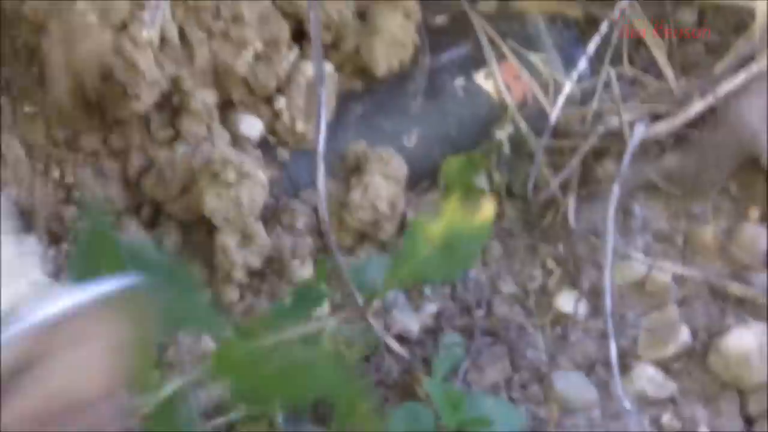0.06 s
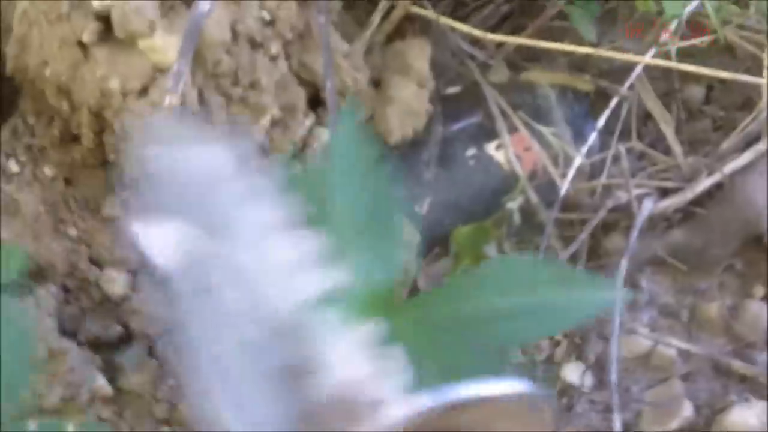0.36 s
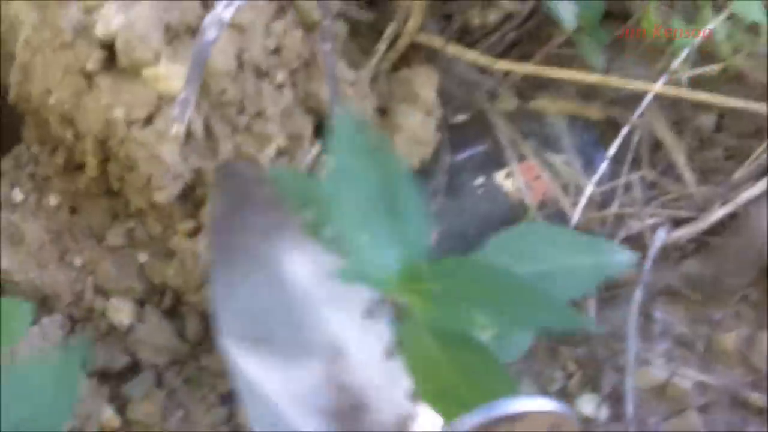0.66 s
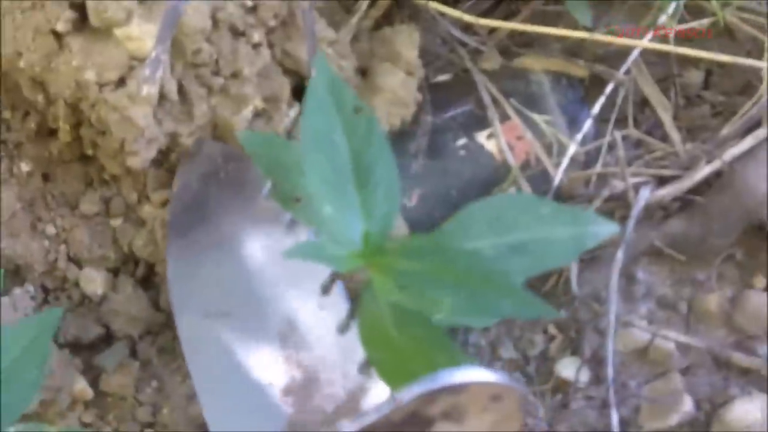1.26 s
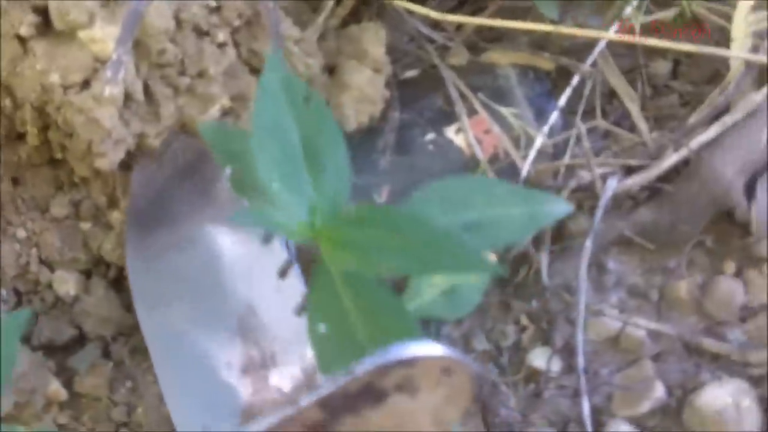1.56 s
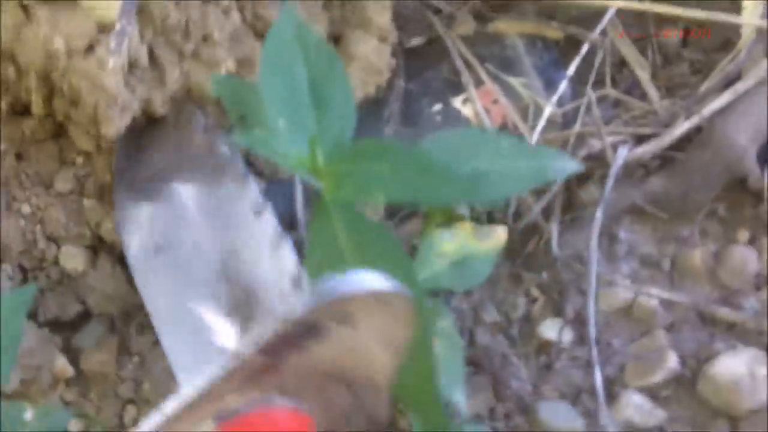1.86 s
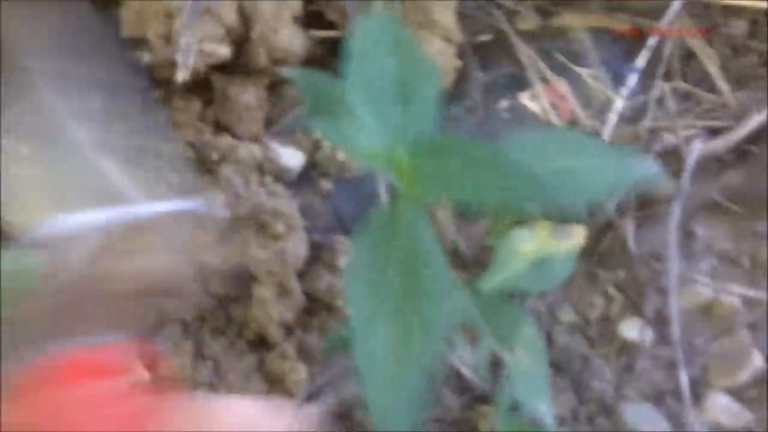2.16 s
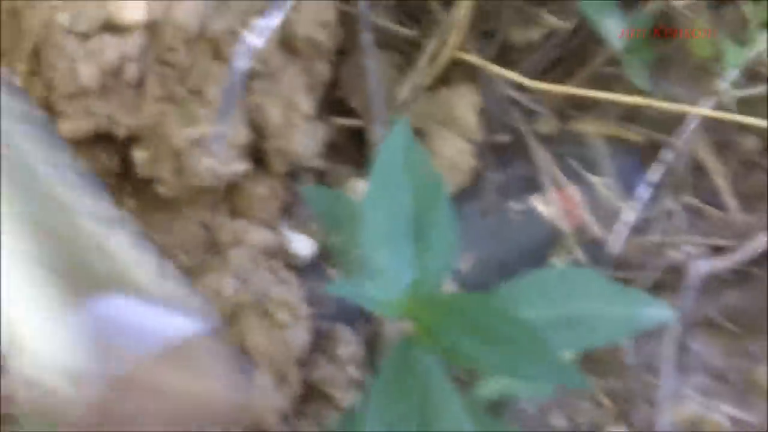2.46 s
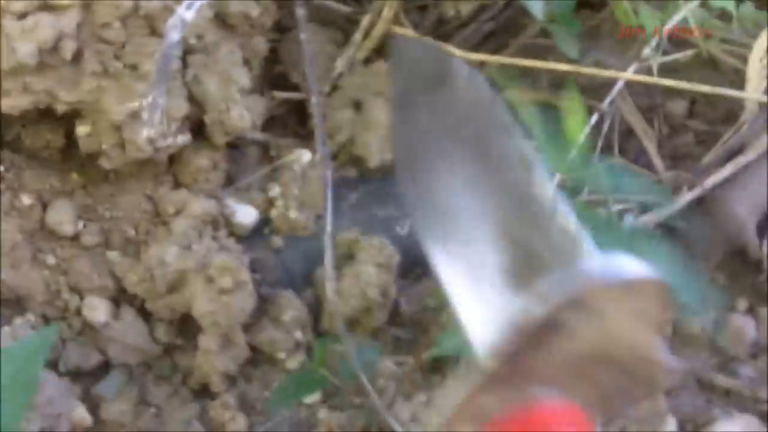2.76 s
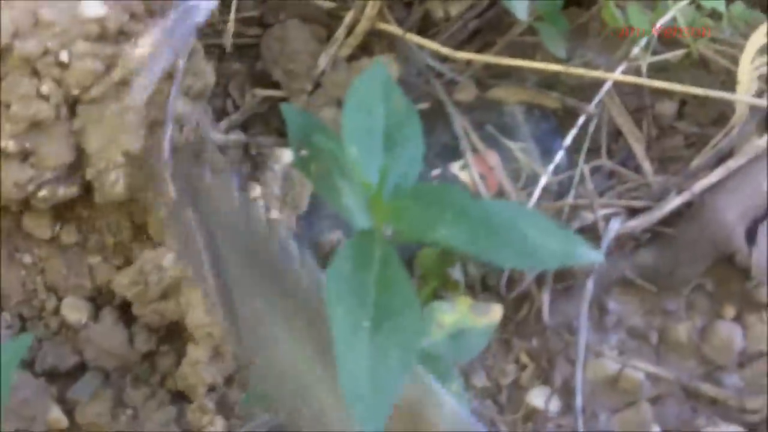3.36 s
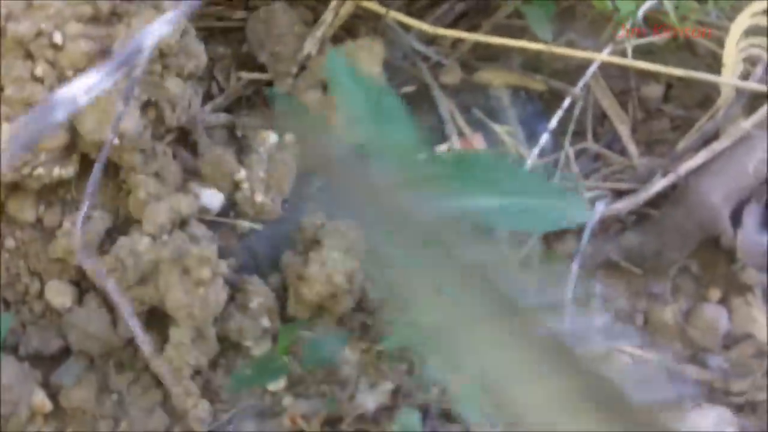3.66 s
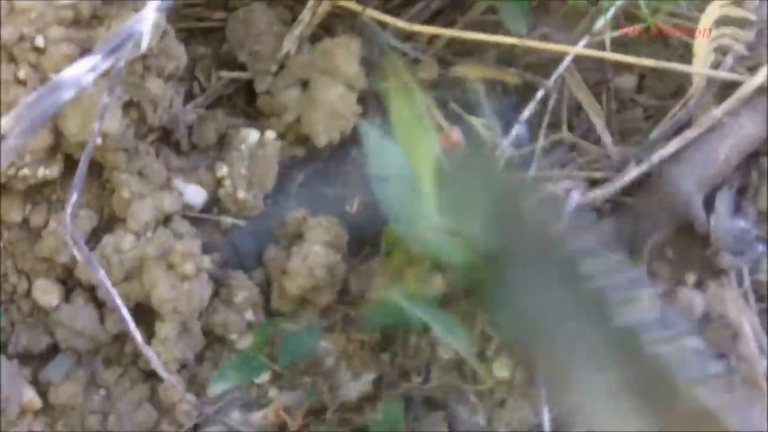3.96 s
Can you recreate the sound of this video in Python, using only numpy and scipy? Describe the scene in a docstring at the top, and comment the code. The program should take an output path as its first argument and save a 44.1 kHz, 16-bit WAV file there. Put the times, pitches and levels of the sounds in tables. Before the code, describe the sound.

Close, irregular scrapes and clinks come from a metal trowel digging stony earth outdoors. A bird sings a short phrase, the blade hits a stone hard, and digging resumes, over soft wind on the microphone and a faint, distant engine.

```python
"""Light air stirs at the microphone and a far engine hums throughout. From the start a close steel trowel
scrapes through dry, gritty soil: grit ticks, stones knock and briefly ring the blade, earth thuds, small
clods tap. From 0.8 s a bird whistles liquid notes, while the buried blade rasps and grit slips on it;
a thin buzz ends the phrase at 2 s. The hardest knock lands at 2.3 s. More digging and two faint
whistles follow from 3 s."""
import sys
import numpy as np
from scipy import signal
from scipy.fft import rfft, irfft, next_fast_len
from scipy.io import wavfile
from scipy.ndimage import map_coordinates

SR = 44100
rng = np.random.default_rng(int(sys.argv[2]) if len(sys.argv) > 2 else 0)


def dump_mix(stems):
    """Bounce the given channels to the path in sys.argv[1] as a 16-bit WAV at rate SR."""
    frames = np.atleast_2d(stems).T  # one column per channel
    limited = np.clip(frames, -1, 1)  # hard clip at full scale
    pcm = np.round(limited * 32767).astype(np.int16)
    wavfile.write(sys.argv[1], SR, pcm)


N = 176400

# Spectra of air (centre, left-right difference) and buffets. Each row: frequency in Hz, gain in dB.
AIR_MID_SPECTRUM = [(20, 2.5), (45, -4), (90, -7.5), (140, -16.5), (250, -20.5), (500, -28.5), (1000, -30),
                    (2000, -35.5), (3200, -36), (4500, -42.5), (6000, -31), (8000, -36), (11000, -46),
                    (15000, -50)]
AIR_SIDE_SPECTRUM = [(20, 14.5), (90, -4), (250, -19.5), (500, -21.5), (1200, -31.5), (4000, -49),
                     (9000, -37), (15000, -29.5)]
BUFFET_SPECTRUM = [(12, 29), (28, -5), (50, -18), (90, -23), (150, -41), (500, -70)]
# Buffets on the microphone. Each row: peak time in seconds, width in seconds, level in dB.
BUFFETS = [(0.348, 0.014, -33), (3.07, 0.024, -29.5), (3.33, 0.068, -36), (3.71, 0.063, -46.5)]
# Strongest engine order. Each row: time in seconds, level in dB.
FIRING_LEVELS = [(0, -59.5), (.7, -52), (1.1, -58.5), (1.5, -50.5), (1.75, -61.5), (2.1, -50.5), (2.5, -60),
                 (4, -57.5)]
# Weaker engine orders. Each row: frequency in Hz, level in dB.
ENGINE_ORDERS = [(115.8, -65), (154.4, -65.5), (173.6, -70), (231.5, -73.5)]
# Strokes through soil. Each row: peak time, rise and fall in seconds; hiss, crunch and ring in dB.
STROKES = [(.095, 0.12, 0.1, -45.5, -52.5, -42), (0.271, 0.073, 0.087, -50.5, -56.5, -77),
           (0.336, 0.017, 0.027, -38.5, -42.5, -80), (.42, 0.13, 0.12, -46, -53, -73),
           (.55, 0.53, 0.26, -58.5, -57.5, -80), (.845, 0.015, 0.049, -56, -57.5, -53),
           (1.016, 0.056, 0.037, -69, -65, -49.5), (1.803, 0.089, 0.047, -37.5, -52, -70),
           (1.825, 0.093, 0.038, -56, -48, -72), (2.045, 0.12, 0.29, -45, -50.5, -50.5),
           (2.21, 0.046, 0.055, -48.5, -55, -47), (2.266, 0.014, 0.023, -45, -42.5, -31.5),
           (2.44, 0.45, 0.081, -57, -67.5, -77), (2.62, 0.38, 0.22, -61.5, -72, -104),
           (3.033, 0.0033, 0.023, -42, -44, -31), (3.18, 0.18, 0.13, -55.5, -60, -57),
           (3.35, 0.28, 0.38, -54, -60, -79), (3.489, 0.027, 0.063, -34.5, -46.5, -32),
           (3.58, 0.14, 0.08, -41, -51, -57), (3.70, 0.078, 0.1, -48.5, -61.5, -84)]
# Blade modes: bending and twisting, edge, soil-damped. Each row: frequency in Hz, gain in dB,
# T60 in seconds.
BODY_MODES = [(589, -10.5, 0.024), (763, -9.5, 0.1), (920, -13, 0.22), (1427, 7.5, 0.041), (1795, 4, 0.032),
              (1972, 2.5, 0.088), (2482, -4.5, 0.096), (3704, -0.5, 0.019)]
EDGE_MODES = [(5310, 0.5, 0.028), (5950, -0.5, 0.014), (7170, -0.5, 0.025), (7484, 4, 0.023),
              (8860, -7, 0.027), (9150, -12.5, 0.03), (9680, -1.5, 0.025), (11460, -9.5, 0.021)]
BURIED_MODES = [(1707, -15.5, 0.017), (6000, -1.5, 0.0097), (6250, -12, 0.016), (7660, 2.5, 0.0044),
                (8550, -5, 0.0063), (10020, -11, 0.0084)]
# Off-centre contact. Each entry: one body mode, favoured (1), unchanged (0) or weakened (-1).
TWIST_SIGNS = [0, -1, 1, 0, -1, 1, -1, 0]
# Spectra of soil and stone contacts. Each row: frequency in Hz, gain in dB.
HISS_SPECTRUM = [(300, -34), (2000, -25), (3800, -12), (4700, -11.5), (5700, 4), (7500, 2.5), (9500, -3.5),
                 (12000, -15), (15000, -21)]
CRUNCH_SPECTRUM = [(120, -10), (300, -14), (700, -3), (1100, -6), (1700, -2.5), (2050, -3), (2400, -6),
                   (3800, -11), (6000, -28.5)]
TICK_SPECTRUM = [(300, -27), (1700, -15), (3000, -24), (4600, -18), (6000, 0), (7800, -3.5), (10000, -13.5),
                 (12000, -20.5), (15000, -31)]
CRACK_SPECTRUM = [(150, -27), (600, -34), (1050, -7.5), (1400, -1.5), (2300, -16), (3000, -17), (3900, -5),
                  (4700, -24), (5600, 5.5), (6500, -5), (7700, 1), (10000, -11), (12000, -16.5),
                  (15000, -26)]
TAP_SPECTRUM = [(100, 7), (350, -2.5), (750, -14.5), (1200, 4), (1700, 3.5), (2400, 3.5), (3600, -20),
                (6000, -27)]
THUD_SPECTRUM = [(60, -12), (220, 9.5), (500, 0.5), (800, -5), (2000, -30)]
# Grit snapping. Each row: start in seconds, level in dB.
TICKS = [(.0255, -40.5), (0.035, -44), (0.055, -33.5), (0.2398, -43.5), (.3295, -38.5), (0.3468, -33.5),
         (.401, -44.5), (0.422, -50), (0.4634, -38), (.584, -50.5), (1.79, -37.5), (1.808, -32),
         (2.212, -26.5), (2.4931, -47), (2.5, -49), (3.2926, -50), (3.322, -48), (3.3461, -40),
         (3.3708, -36.5), (3.449, -44), (3.596, -42), (3.7026, -38.5)]
# Blade on stones. Each row: start in seconds; crack, body ring and edge ring in dB; body tilt in dB
# per octave; off-centre bias in dB; crush before contact in seconds.
KNOCKS = [(0.0685, -41, -38.5, -45, 0, -7, .002), (.118, -38, -40, -42, -5, -2, 0.0025),
          (.1355, -52, -44.5, -30, 18, -3, .001), (0.1573, -41.5, -34.5, -48, -16.5, 0.5, 0.00081),
          (0.2159, -49, -58, -49.5, 8, 4, .001), (0.2743, -67, -53, -45.5, 6, 11, .002),
          (.831, -56, -50.5, -55, -14, -8, .001), (1.2015, -46, -56.5, -53, 19, -3, 0.003),
          (2.2531, -38, -33.5, -46, -1, 0, .001), (2.2647, -50, -36.5, -45, -5, -4.5, .004),
          (2.291, -55, -53.5, -39, 5, 3, 0.0043), (2.3167, -14, -23, -25, -4, 3.5, 0.00078),
          (2.3338, -41, -39.5, -32, 21, 5, .001), (3.0314, -48, -43.5, -35.5, -3.5, 3, .001),
          (3.0338, -45, -37.5, -40, -9.5, -8, .002), (3.0477, -51, -42, -41, -5, -1.5, .001),
          (3.0549, -39, -59, -29.5, 20, -14, .001), (3.0788, -40, -72, -44, 12, 0, .001),
          (3.4919, -23, -32.5, -30, 3, -6.5, 0.0098), (3.4952, -38, -36.5, -30, 9, -14, .002),
          (3.508, -25.5, -37.5, -30, 5, 3.5, 0.0025), (3.5258, -26.5, -27, -34, 2.5, -6, 0.00044)]
# Earth giving way. Each row: start in seconds, level in dB.
THUDS = [(0.156, -49), (0.349, -47), (2.317, -50.5)]
# Clods and pebbles landing. Each row: start in seconds, level in dB, pitch shift in octaves.
TAPS = [(.247, -42.5, -0.074), (.258, -47, -0.21), (0.346, -44, 0.25), (0.361, -46.5, 0.034),
        (.397, -50, -0.064), (0.421, -43, -1.1), (0.4624, -50, 0.52), (0.744, -47, -0.91),
        (.772, -48.5, 0.16), (.832, -45, -1.14), (0.88, -54, -0.11), (1.065, -46.5, -0.087),
        (1.83, -49, -0.33), (1.929, -47, 0.25), (2.2102, -36.5, -0.018), (3.465, -41.5, -0.21)]
# Bird notes. Each row: start and length in seconds, start and target pitch in Hz, glide time
# constant in seconds, level in dB.
WHISTLES = [(0.768, 0.06, 3000, 3180, 0.017, -64), (0.861, 0.11, 2870, 3080, 0.0365, -66),
            (1.121, 0.045, 3200, 3230, 0.016, -57), (1.164, 0.086, 3090, 3125, 0.004, -45.5),
            (1.214, 0.19, 1905, 2373, 0.047, -49), (1.351, 0.14, 3380, 3425, .04, -53.5),
            (1.435, 0.097, 3106, 2870, 0.0141, -46), (1.629, 0.019, 2897, 2900, .02, -48),
            (3.072, 0.042, 3350, 3280, 0.026, -60.5), (3.876, 0.036, 3740, 2540, 0.0125, -62)]
# Buzz voices. Each row: start and length in seconds; start pitch, end pitch and flutter in Hz;
# level in dB.
BUZZ_VOICES = [(1.621, .37, 6900, 6650, 188, -49), (1.609, 0.38, 5200, 5420, 83, -58)]
# Buried pushes. Each row: peak time, rise and fall in seconds; edge rasp and body rasp in dB.
PUSHES = [(1.01, 0.12, 0.15, -78, -57.5), (1.46, 0.21, 0.25, -53, -57), (1.62, 0.11, 0.096, -49, -54.5),
          (1.816, 0.05, 0.037, -60, -43), (2.04, 0.1, 0.14, -40.5, -48)]
# Grit slipping on the buried blade. Each row: start in seconds, level in dB.
SLIPS = [(1.339, -49.5), (1.403, -35), (1.497, -39.5), (1.51, -48), (1.604, -32.5), (1.6225, -37),
         (1.663, -37), (1.679, -44), (2.065, -47), (2.099, -40)]
# Constant offset, left then right. Each row: offset as a fraction of full scale.
DC_OFFSET = [
    [-.0092],
    [-.0168],
]

SOIL_DETUNE_RATIO = 0.0037  # soil pressure shifts the modes
TICK_T60_S, GRIT_CRUSH_S, GRIT_CRUSH_DB = 0.0036, 0.0088, -3


def amp(db):
    """Decibels to gain."""
    return 10 ** (np.asarray(db) / 20)


def unit(x):
    """Scale to rms 1."""
    return x / np.sqrt(np.mean(x ** 2) + 1e-20)


def unit_attack(x):
    """Scale to rms 1 over the first 4 ms."""
    return x / np.sqrt(np.mean(x[:SR // 250] ** 2))


def clock(length_s):
    """Sample times in seconds."""
    return np.arange(int(length_s * SR)) / SR


def add(track, start_s, x):
    """Mix x into the track."""
    i = max(0, round(start_s * SR))
    track[i:i + len(x)] += x[:max(0, N - i)]


def wobble(knots_per_s):
    """Smooth random curve, N samples."""
    return map_coordinates(rng.standard_normal(4096), [np.arange(N) * knots_per_s / SR], mode="wrap")


def colour(x, spectrum):
    """Minimum-phase filter through (Hz, dB) points."""
    n = x.shape[-1]
    size = 2 * next_fast_len(n // 2 + 2048)
    hz, db = np.transpose(spectrum)
    gain_db = np.interp(np.log(np.fft.rfftfreq(size, 1 / SR) + 1), np.log(hz), db)
    cepstrum = irfft(np.log(amp(gain_db)))
    cepstrum[1:size // 2] *= 2
    cepstrum[size // 2 + 1:] = 0
    return irfft(rfft(x, size) * np.exp(rfft(cepstrum)), size)[..., :n]


def air(level_db=-50.5, side_db=-14, swell_db=1):
    """Quiet outdoor air, nearly mono, softly buffets the microphone."""
    t = np.arange(N) / SR
    noise = lambda spectrum: unit(colour(rng.standard_normal(N), spectrum))
    mid = noise(AIR_MID_SPECTRUM) * amp(level_db + swell_db * wobble(1.43))
    side = noise(AIR_SIDE_SPECTRUM) * amp(level_db + side_db)
    puffs = sum(amp(db) * np.exp(-.5 * ((t - peak_s) / width_s) ** 2) for peak_s, width_s, db in BUFFETS)
    return mid + puffs * noise(BUFFET_SPECTRUM) + np.array([side, -side])


def tone(hz):
    """Sine following a pitch curve."""
    return np.sin(2 * np.pi * np.cumsum(hz) / SR)


def engine(firing_hz=77.4, waver_db=2, drift_hz=0.32):
    """A far engine hums in low, wavering orders."""
    order = lambda hz: unit(tone(hz + drift_hz * wobble(4.56))) * amp(waver_db * wobble(5.13))
    firing_db = np.interp(np.arange(N) / SR, *np.transpose(FIRING_LEVELS))
    return amp(firing_db) * order(firing_hz) + sum(amp(db) * order(hz) for hz, db in ENGINE_ORDERS)


def swells(rows, shape=0.91, judder_db=3, judder_per_s=83):
    """Juddering stroke gains, one curve per level column; rise and fall each span 20 dB."""
    t, power = np.arange(N) / SR, 0
    for peak_s, rise_s, fall_s, *levels_db in rows:
        distance = np.where(t < peak_s, (peak_s - t) / rise_s, (t - peak_s) / fall_s)
        envelope = amp(-20 * np.minimum(distance ** shape, 10))
        power = power + (amp(levels_db)[:, None] * envelope) ** 2
    return np.sqrt(power) * amp(judder_db * wobble(judder_per_s))


def grains(rate_per_s=7000, spread_db=6):
    """Dense tiny impacts of very unequal size."""
    impacts = (rng.random(N) < rate_per_s / SR) * rng.choice([-1, 1], N)
    return impacts * amp(spread_db * np.clip(rng.standard_normal(N), -3, 3))


def contact_db(tilt_db_per_oct, bias_db):
    """Body mode weights: hard contact tilts them up, off-centre contact twists the blade."""
    return tilt_db_per_oct * np.log2(np.transpose(BODY_MODES)[0]) + bias_db * np.array(TWIST_SIGNS)


def ring(modes, weights_db=0, detune_ratio=0, scatter_db=1.7, rise_s=0.00005):
    """Damped blade modes, weighted anew for each contact point."""
    t = clock(.3)
    hz, db, t60_s = np.transpose(modes)
    hz = hz * (1 + detune_ratio * rng.standard_normal(len(hz)))
    signs = rng.choice([-1, 1], len(hz))
    gains = signs * amp(db + weights_db + scatter_db * rng.standard_normal(len(hz)))
    partials = amp(-60 * t / t60_s[:, None]) * np.sin(2 * np.pi * hz[:, None] * t)
    onset = 1 - np.exp(-t / rise_s)
    return unit_attack(onset * (gains @ partials))


def rub(modes, weights_db=0, point_count=3, wander_per_s=25):
    """Grains drive the modes; the mix shifts as the rubbing point wanders."""
    points = [unit(signal.fftconvolve(grains(), ring(modes, weights_db, SOIL_DETUNE_RATIO))[:N])
              for _ in range(point_count)]
    shares = np.array([np.exp(wobble(wander_per_s)) for _ in points])
    return unit((shares * points).sum(0) / np.linalg.norm(shares, axis=0))


def scrapes(edge_db=3):
    """Dragged grains hiss, crunch and ring the free blade."""
    hiss_gain, crunch_gain, ring_gain = swells(STROKES)
    hiss = unit(colour(grains(), HISS_SPECTRUM))
    crunch = unit(colour(grains(), CRUNCH_SPECTRUM))
    body = rub(BODY_MODES, contact_db(tilt_db_per_oct=4, bias_db=2))
    edge = amp(edge_db) * rub(EDGE_MODES)
    return hiss_gain * hiss + crunch_gain * crunch + ring_gain * unit(body + edge)


def crush(length_s):
    """Grit gives way just before a contact."""
    rise = np.linspace(0, 1, int(length_s * SR) + 8) ** 2
    return colour(np.pad(rise * rng.standard_normal(len(rise)), (0, 512)), HISS_SPECTRUM)


def burst(spectrum, t60_s, rise_s=0.0005):
    """One contact: short, coloured, decaying noise."""
    t = np.arange(2048) / SR
    envelope = (1 - np.exp(-t / rise_s)) * amp(-60 * t / t60_s)
    return unit_attack(colour(rng.standard_normal(len(t)) * envelope, spectrum))


def grit_ticks():
    """Grit crushes, then snaps."""
    out = np.zeros(N)
    for start_s, db in TICKS:
        add(out, start_s - GRIT_CRUSH_S, amp(db + GRIT_CRUSH_DB) * crush(GRIT_CRUSH_S))
        add(out, start_s, amp(db) * burst(TICK_SPECTRUM, TICK_T60_S))
    return out


def stone_knocks():
    """The blade crushes grit, cracks against a stone and rings."""
    out = np.zeros(N)
    for start_s, crack_db, body_db, edge_db, tilt_db_per_oct, bias_db, crush_s in KNOCKS:
        add(out, start_s - crush_s, amp(edge_db) * crush(crush_s))
        add(out, start_s, amp(crack_db) * burst(CRACK_SPECTRUM, t60_s=0.0043))
        add(out, start_s, amp(body_db) * ring(BODY_MODES, contact_db(tilt_db_per_oct, bias_db)))
        add(out, start_s, amp(edge_db) * ring(EDGE_MODES, detune_ratio=SOIL_DETUNE_RATIO))
    return out


def earth_thuds():
    """Earth gives way under the blade with a low thud."""
    out = np.zeros(N)
    for start_s, db in THUDS:
        add(out, start_s, amp(db) * burst(THUD_SPECTRUM, t60_s=0.043))
    return out


def clod_taps():
    """Clods and pebbles drop, each at its own pitch."""
    out = np.zeros(N)
    for start_s, db, shift_oct in TAPS:
        spectrum = [(hz * 2 ** shift_oct, gain_db) for hz, gain_db in TAP_SPECTRUM]
        add(out, start_s, amp(db) * burst(spectrum, t60_s=0.009))
    return out


def bird(warble_hz=18.4, tremble_db=2, echo_db=-1, echo_t60_s=0.96):
    """Gliding whistles and a two-voiced buzz echo among trees."""
    song = np.zeros(N)
    fade = lambda t, edge_s: np.clip(np.minimum(t, t[-1] - t) / edge_s, 0, 1)
    for start_s, length_s, start_hz, target_hz, glide_s, db in WHISTLES:
        t = clock(length_s)
        glide_hz = target_hz + (start_hz - target_hz) * np.exp(-t / glide_s)
        hz = glide_hz + warble_hz * wobble(150)[:len(t)]
        gain = amp(db + tremble_db * wobble(70)[:len(t)])
        add(song, start_s, gain * fade(t, edge_s=0.018) * tone(hz))
    for start_s, length_s, start_hz, end_hz, flutter_hz, db in BUZZ_VOICES:
        t = clock(length_s)
        hz = np.linspace(start_hz, end_hz, len(t)) + flutter_hz * wobble(600)[:len(t)]
        add(song, start_s, amp(db) * fade(t, edge_s=0.036) * tone(hz))
    t = clock(.9)
    tail = rng.standard_normal(len(t)) * amp(-60 * t / echo_t60_s)
    echo = signal.fftconvolve(song, tail / np.linalg.norm(tail))[:N]
    return song + amp(echo_db) * echo


def buried_pushes():
    """Grains rasp on the soil-damped edge and body of the blade."""
    edge_gain, body_gain = swells(PUSHES)
    return edge_gain * rub(BURIED_MODES[1:]) + body_gain * rub(BURIED_MODES[:1])


def grit_slips(snap_db=-7):
    """Grit crushes, slips with a snap and rings the buried blade."""
    out = np.zeros(N)
    for start_s, db in SLIPS:
        add(out, start_s - GRIT_CRUSH_S, amp(db + GRIT_CRUSH_DB) * crush(GRIT_CRUSH_S))
        add(out, start_s, amp(db + snap_db) * burst(TICK_SPECTRUM, TICK_T60_S))
        add(out, start_s, amp(db) * ring(BURIED_MODES))
    return out


def scene():
    """Stereo air; all other sources centred."""
    return (air() + engine() + scrapes() + grit_ticks() + stone_knocks() + earth_thuds()
            + clod_taps() + bird() + buried_pushes() + grit_slips())


def record(dry, ceiling=.9, notch_hz=4200, notch_width_hz=635, notch_depth=0.9, top_hz=15600):
    """Soft clip, microphone port notch, band limit, DC offset."""
    size = next_fast_len(N + SR // 2)
    hz = np.fft.rfftfreq(size, 1 / SR)
    clipped = dry / (1 + (dry / ceiling) ** 8) ** .125
    damping = 1j * hz * notch_width_hz
    port_notch = 1 - notch_depth * damping / (notch_hz ** 2 - hz ** 2 + damping)
    lowpass = 1 / np.sqrt(1 + (hz / top_hz) ** 120)
    return irfft(rfft(clipped, size) * port_notch * lowpass, size)[:, :N] + np.array(DC_OFFSET)


dry = scene()
out = record(dry)
dump_mix(out)
```